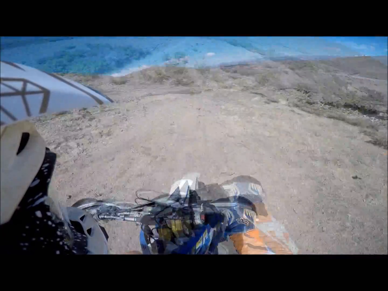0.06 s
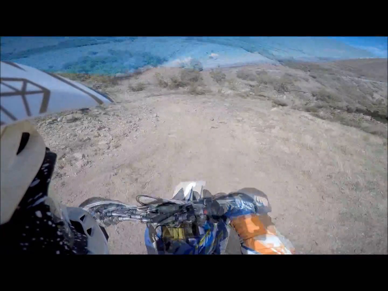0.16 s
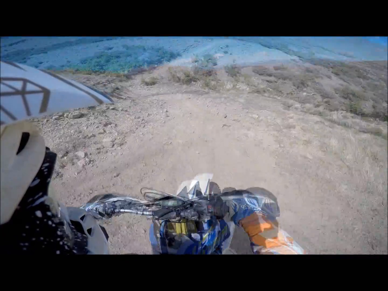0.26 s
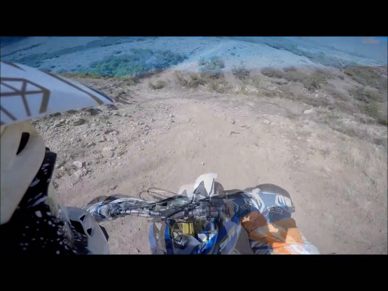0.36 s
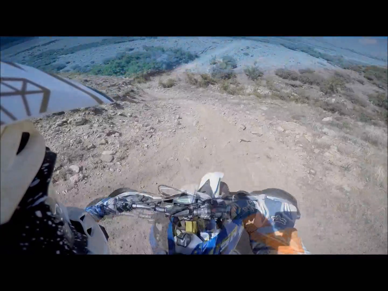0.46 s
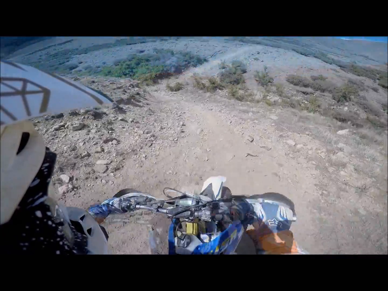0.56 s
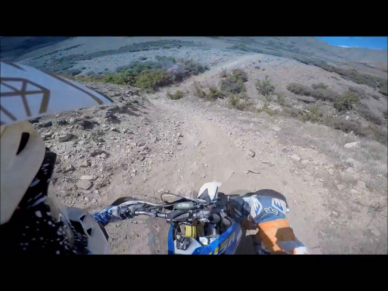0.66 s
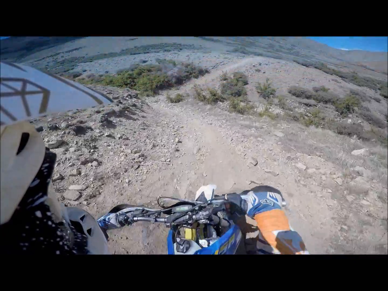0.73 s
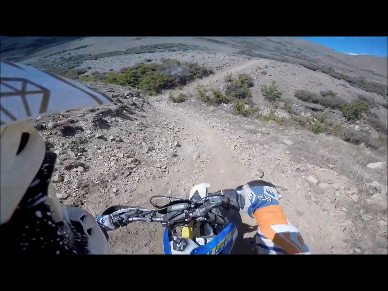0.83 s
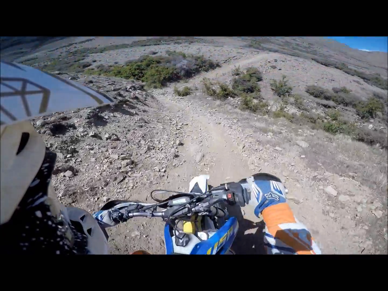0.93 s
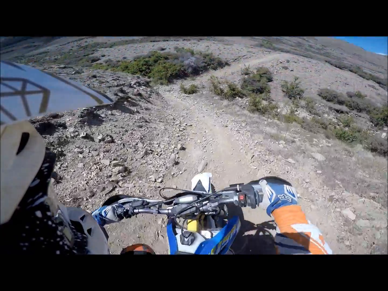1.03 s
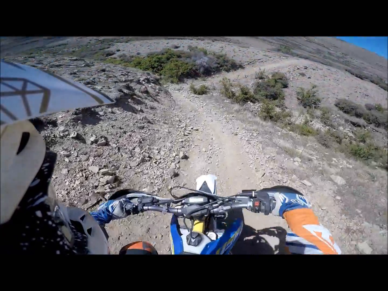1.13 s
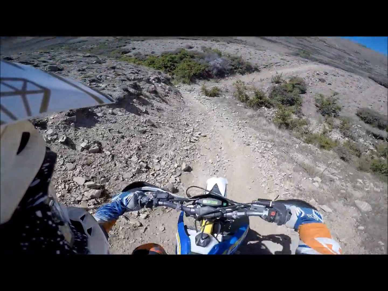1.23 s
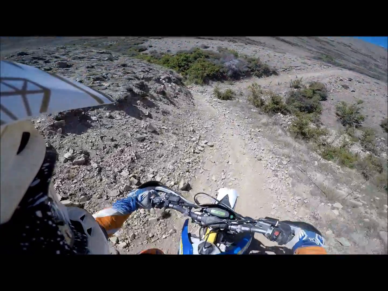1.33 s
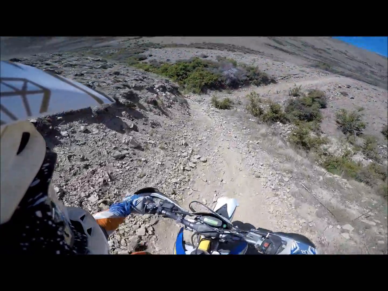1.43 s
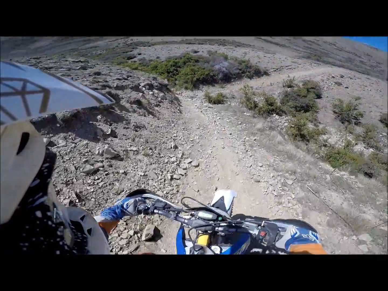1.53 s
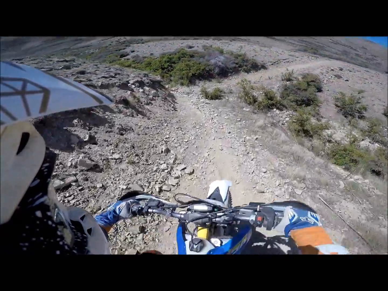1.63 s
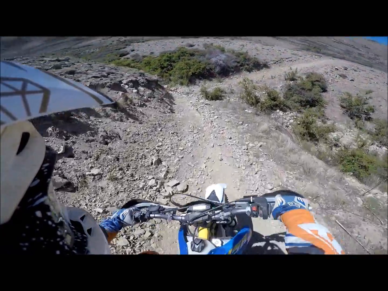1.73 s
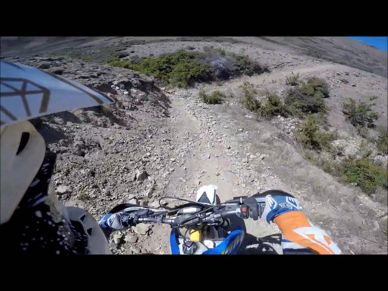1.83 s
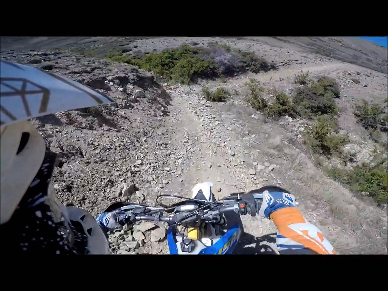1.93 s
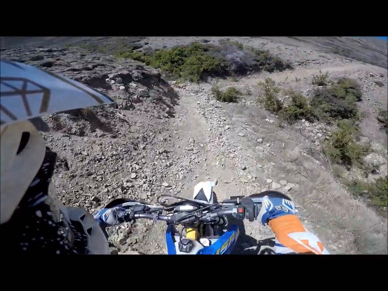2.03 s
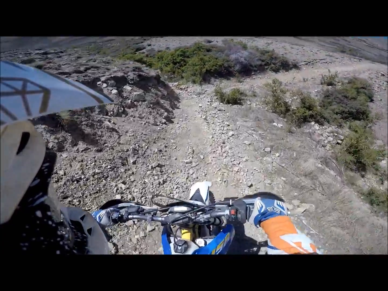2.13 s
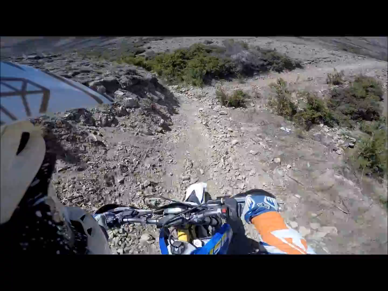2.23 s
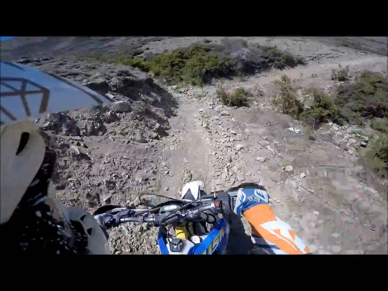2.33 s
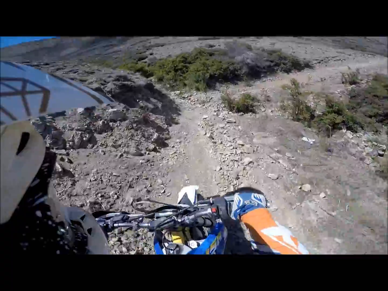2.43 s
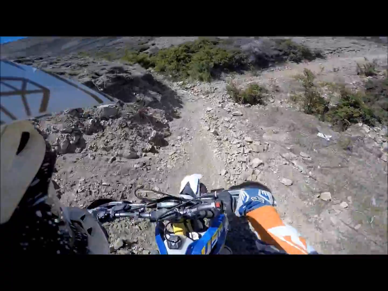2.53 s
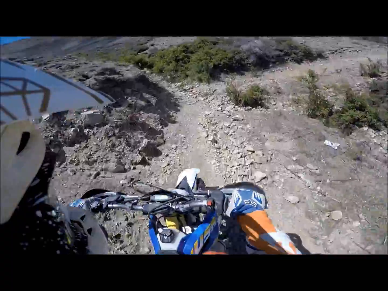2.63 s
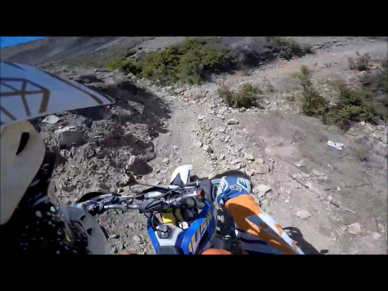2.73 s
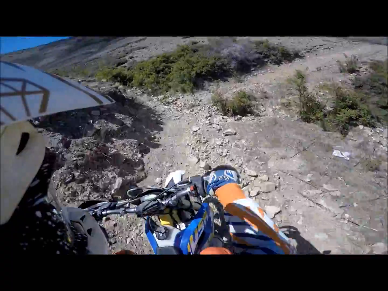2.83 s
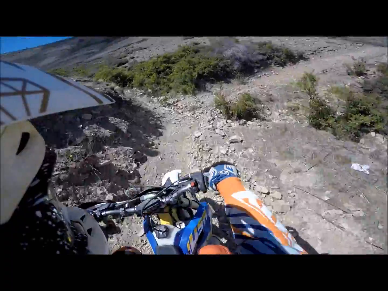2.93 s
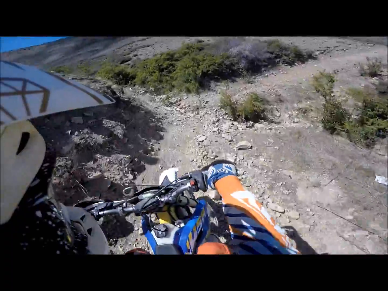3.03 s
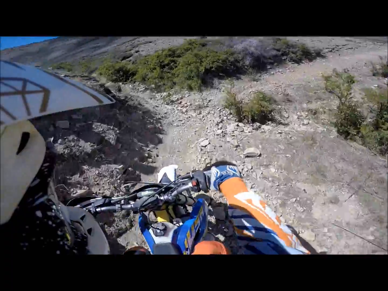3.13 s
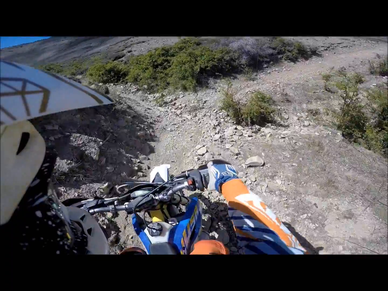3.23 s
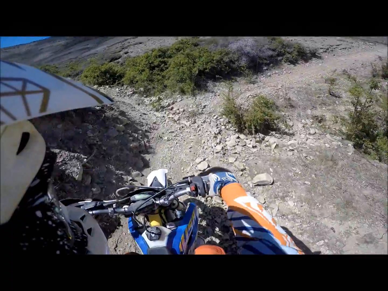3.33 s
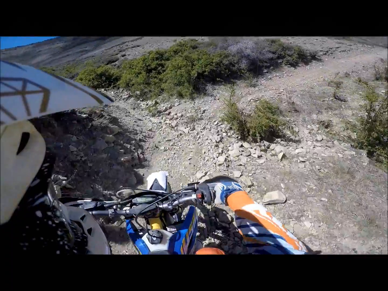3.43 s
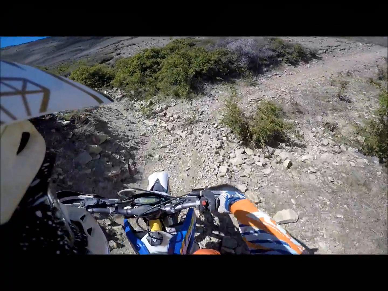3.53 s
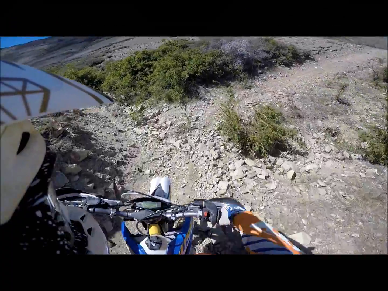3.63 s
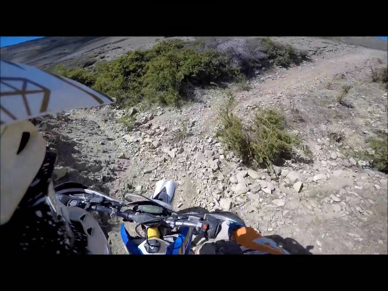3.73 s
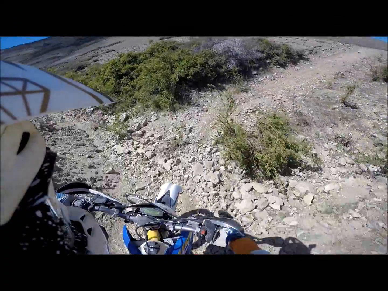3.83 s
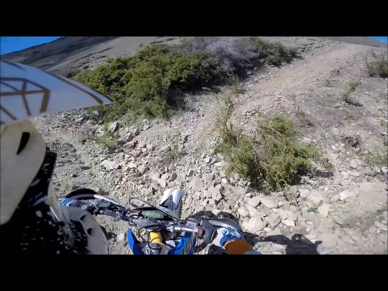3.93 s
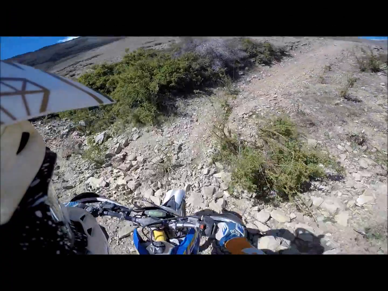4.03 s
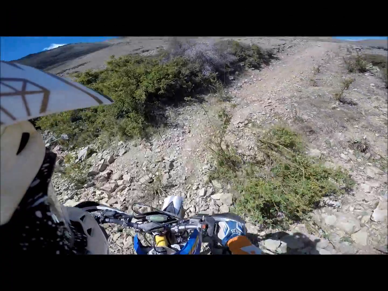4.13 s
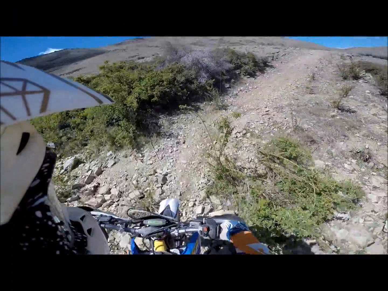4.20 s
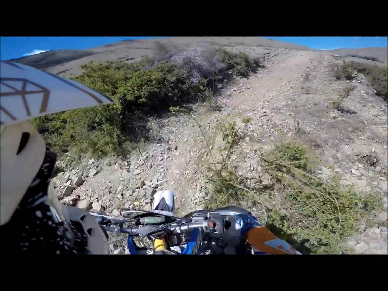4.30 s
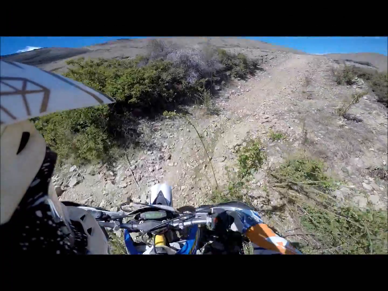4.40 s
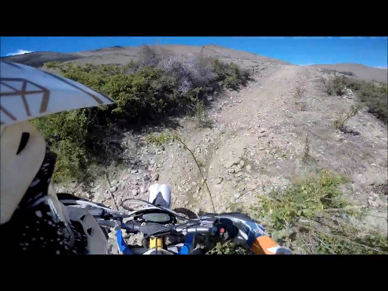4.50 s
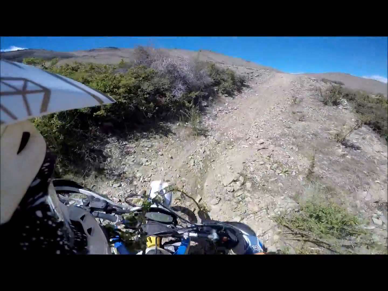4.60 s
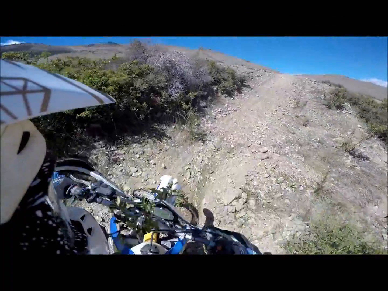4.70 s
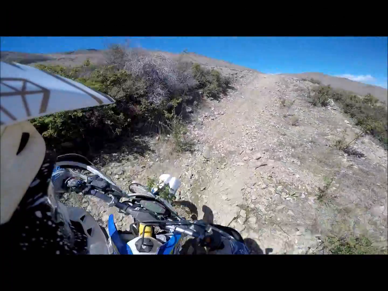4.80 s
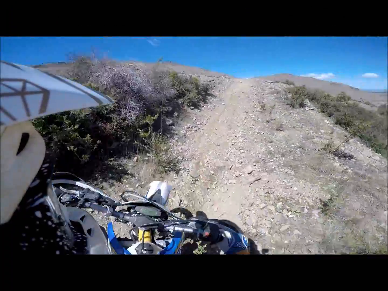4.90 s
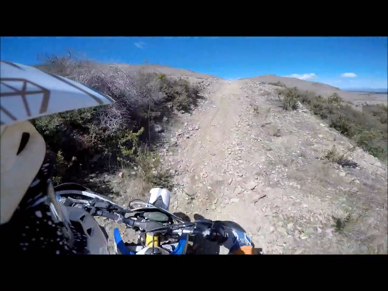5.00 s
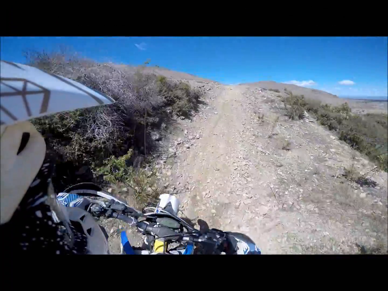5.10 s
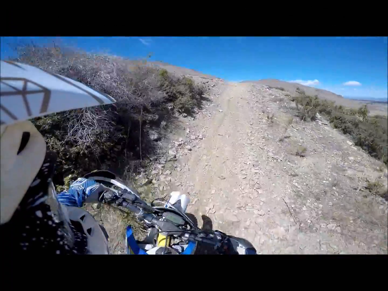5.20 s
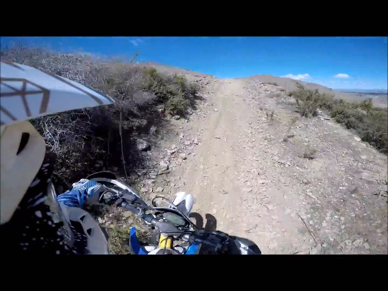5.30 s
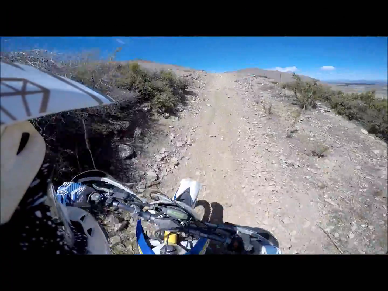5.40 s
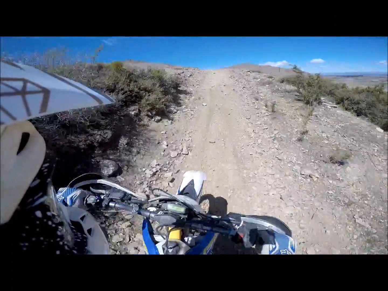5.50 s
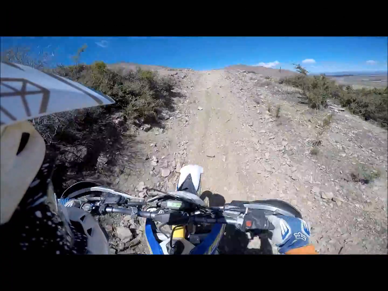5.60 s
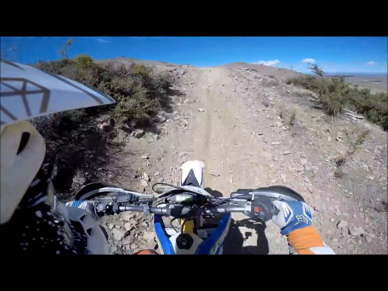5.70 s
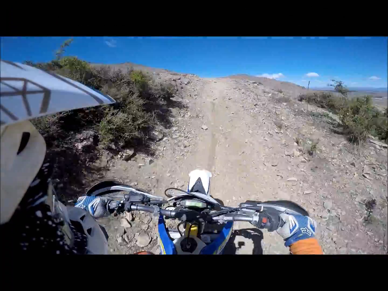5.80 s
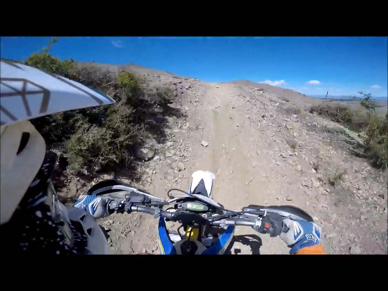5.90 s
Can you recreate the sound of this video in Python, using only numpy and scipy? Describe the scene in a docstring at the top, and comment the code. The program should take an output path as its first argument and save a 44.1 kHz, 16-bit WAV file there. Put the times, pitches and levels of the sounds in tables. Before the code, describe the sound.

Close, dry mono outdoor sound of an off-road motorcycle. A brief buzzing pull gives way to irregular barks and low gas muttering as the engine slows almost to stalling, with chain rattle, sharp pebble ticks and soft rumbling wind. It then revs in short bursts and settles on a strong, sustained nasal drone that grows harder as the throttle opens wide.

```python
"""First a droning two-stroke pull, then single stumbling pops, then longer pulls that end on a wide throttle.
An enduro bike on a stony hill trail, heard from the rider's helmet. Pulls are multiples of the crank speed
filtered by the exhaust pipe, with rasping gas; off the throttle, noise and weak pulses mutter and hard
firings excite decaying pipe resonances and a noisy chamber ping. Shaped noise gives the wind, clatter and
grit; clusters of short decaying modes give the stones that knock under the tyres."""
import sys
import numpy as np
from scipy import signal
from scipy.fft import rfft, irfft, next_fast_len
from scipy.io import wavfile
from scipy.ndimage import map_coordinates

SR = 44100
rng = np.random.default_rng(int(sys.argv[2]) if len(sys.argv) > 2 else 0)


def generate_wav(signal):
    """Clip the signal to [-1, 1] and save it as 16-bit WAV at the path in sys.argv[1]."""
    frames = np.transpose(np.atleast_2d(signal))
    scaled = np.clip(frames, -1, 1) * 32767
    pcm = np.round(scaled).astype(np.int16)
    wavfile.write(sys.argv[1], SR, pcm)


N = 262395


def amp(db):
    """Decibel law: level to amplitude gain."""
    return 10 ** (np.asarray(db) / 20)


def unit(x):
    """Normalisation: scale to rms 1."""
    return x / np.sqrt(np.mean(x ** 2) + 1e-20)


def along(points, x):
    """Logarithmic interpolation: read (x, dB) points on a log axis."""
    at, db = np.transpose(points)
    return np.interp(np.log(x + 1), np.log(at + 1), db)


def curve(rows):
    """Linear interpolation: (seconds, value) rows to one value per sample."""
    s, value = np.transpose(rows)
    return np.interp(np.arange(N) / SR, s, value)


def wobble(rate, step=16):
    """Slow random modulation: a smooth curve through rate random knots a second."""
    at = np.arange(0, N + step, step)
    knots = rng.standard_normal(int(N * rate / SR) + 4)
    return np.interp(np.arange(N), at, map_coordinates(knots, [at * rate / SR]))


def filtered(x, response):
    """Linear filtering: multiply the spectrum by a response of frequency."""
    size = next_fast_len(len(x) + SR // 2)
    spectrum = rfft(x, size) * response(np.fft.rfftfreq(size, 1 / SR))
    return irfft(spectrum, size)[:len(x)]


def noise(spectrum):
    """Spectral shaping: white noise coloured by (Hz, dB) points, at rms 1."""
    return unit(filtered(rng.standard_normal(N), lambda hz: amp(along(spectrum, hz))))


def ring(spectrum, size=8192):
    """Minimum phase: folding the cepstrum gives a causal impulse response of energy 1."""
    cepstrum = irfft(np.log(amp(along(spectrum, np.fft.rfftfreq(size, 1 / SR))) + 1e-6))
    cepstrum[1:size // 2] *= 2
    cepstrum[size // 2 + 1:] = 0
    response = irfft(np.exp(rfft(cepstrum)))
    return response / np.linalg.norm(response)


def add(track, s, sound):
    """Superposition: mix a sound into the track from time s."""
    part = track[max(round(s * SR), 0):][:len(sound)]
    part += sound[:len(part)]


# Wind spectrum. Each row: frequency in Hz, relative level in dB.
WIND = [(8.8, -30.5), (15, 3.5), (32, -1.5), (80, -0.5), (119, -7), (200, -12), (260, -39), (440, -120)]
# Strength of the wind on the helmet. Each row: time in seconds, level in dB before WIND_DB.
GUSTS = [(0.0, -26), (0.05, -20), (0.88, -14), (1.21, -26.5), (1.97, -18.5), (2.75, -25), (3.38, -20.5),
         (3.73, -25), (4.19, -17.5), (4.31, -30), (4.66, -23), (4.71, -38), (4.96, -23), (5.14, -34),
         (5.95, -32)]
WIND_DB = 1.1  # over the gust curve


def wind():
    """Turbulence: low noise with random swells buffets the helmet."""
    buffeting = unit(noise(WIND) * amp(1.4 * wobble(12)))
    return amp(curve(GUSTS) + WIND_DB) * buffeting


# Stones and twigs on rim and frame. Each row: start in seconds, level in dB before the decay,
# centre pitch in Hz, spread either way in log pitch.
KNOCKS = [(0.301, -24, 2482, 0.06), (0.324, -22.5, 3560, 0.55), (1.040, -27.5, 2330, 0.21),
          (1.087, -30, 2360, 0.16), (1.323, -26, 2992, 0.75), (1.465, -27, 3734, 0.34),
          (1.651, -25, 2784, 1.06), (2.115, -21, 720, 0.28), (2.145, -21.5, 2220, 1.1),
          (2.6, -28.5, 2730, 0.8), (4.644, -23.5, 5649, 0.12), (4.648, -18.5, 1913, 0.55),
          (4.696, -27, 2350, 0.53)]
KNOCK_T60_S, KNOCK_REF_HZ, KNOCK_SLOPE = 0.046, 2500, 0.7  # ring time at that pitch; lower knocks ring longer


def knocks(count=96):
    """Modal impact: each strike rings a cluster of short modes around its pitch."""
    out = np.zeros(N)
    t = np.arange(SR // 8) / SR
    for s, db, hz, spread in KNOCKS:
        offset, phase = rng.uniform(-1, 1, (2, count, 1))
        modes = np.sin(2 * np.pi * (hz * np.exp(spread * offset) * t + phase)).sum(0)
        t60 = KNOCK_T60_S * (KNOCK_REF_HZ / hz) ** KNOCK_SLOPE
        envelope = amp(-60 * t / t60) * (1 - np.exp(-t / 0.00037))
        add(out, s, amp(db) * unit(modes) * envelope)
    return out


# Crank speed under load, one list per stretch. Each row: time in seconds, turns per second.
REVS = [
    [(0.0, 65.7), (0.12, 71.6), (0.2, 65.4)],
    [(4.62, 50), (4.748, 59.6), (4.8, 59)],
    [(4.92, 45.4), (5.02, 55), (5.082, 60.1), (5.344, 62.3), (5.424, 67.2), (5.722, 62.1), (5.9, 66.6),
     (5.95, 64.9)],
]
# Crank speed on a closed or blipped throttle. Each row: time in seconds, turns per second.
COAST = [(0.5, 41.4), (0.7, 39.4), (0.94, 29.8), (1.1, 42.4), (1.4, 26), (2.3, 19.8), (3.98, 23),
         (4.21, 56), (4.4, 32)]


def crank_speed():
    """Rotational speed: loaded and coasting points join in one curve of turns per second."""
    loaded = [tuple(row) for rows in REVS for row in rows]
    return curve(sorted(loaded + [tuple(row) for row in COAST]))


# Throttle opening. Each row: time in seconds, opening from 0 (part) to 1 (wide).
THROTTLE = [(5.26, 0.088), (5.4, 0.95)]


def throttle():
    """Control curve: 0 on part throttle, 1 wide open."""
    return np.clip(curve(THROTTLE), 0, 1)


# Stretches of steady pull. Each row: start in seconds, end in seconds, then the levels of
# boom, bark and rasp in dB before WIDE_DB.
PULLS = [(-0.2, 0.239, -12, -17, -37), (4.074, 4.301, -16, -17.5, -37.5), (4.503, 4.82, -10.5, -16, -40),
         (4.876, 6.1, -12, -16, -43)]
PULL_ATTACK_S, PULL_RELEASE_S = 0.14, 0.064  # the engine picks up slowly and drops away faster
WIDE_DB = (-0.5, -2, 4)  # what a wide throttle adds to boom, bark and rasp


def pull_gain(layer):
    """Amplitude envelope of boom (0), bark (1) or rasp (2): each pull swells, holds and drops away."""
    t = np.arange(N) / SR
    gain = np.zeros(N)
    for start, end, *levels in PULLS:
        swell = np.clip((t - start) / PULL_ATTACK_S, 0, 1)
        drop = np.clip((end - t) / PULL_RELEASE_S, 0, 1)
        gain += amp(levels[layer]) * swell * drop
    return gain * amp(WIDE_DB[layer] * throttle())


def load():
    """Saturating drive: 0 with the throttle shut, 1 when the engine pulls."""
    return np.clip(pull_gain(0) / .1, 0, 1)


def firings(turns, speed, jitter_s, scatter_db):
    """Impulse train: one uneven pulse per crank turn, with mean power about 1."""
    at = np.flatnonzero(np.diff(np.floor(turns)))
    chance = rng.standard_normal((len(at), 2))
    when = np.clip(at + jitter_s * SR * chance[:, 0], 0, N - 1).astype(int)
    strength = amp(scatter_db * chance[:, 1]) * np.sqrt(SR / speed[at])
    return np.bincount(when, strength, N)


# Spectrum of clatter and grit. Each row: frequency in Hz, relative level in dB.
RATTLE = [(410, -40.5), (700, 1), (968, -7.5), (1160, -12.5), (1360, -10), (2130, -14), (2340, -11.5),
          (2730, -8), (3190, -17), (4130, -15), (5940, -19.5), (7400, -26.5), (8210, -34), (13100, -38.5),
          (15500, -54)]


def rattle(turns, level_db):
    """Modulated noise: piston and chain clatter swells with each turn; random grains of grit crackle."""
    each_turn = unit(1.13 + np.exp(-(turns % 1) / 0.1))
    clatter = each_turn * amp(1.75 * wobble(35)) * noise(RATTLE)
    # about 160 grains a second of uneven strength
    grains = (rng.random(N) < 160 / SR) * amp(3.7 * np.minimum(rng.exponential(size=N), 3))
    t = np.arange(SR // 50) / SR
    bursts = signal.fftconvolve(grains, np.exp(-t / 0.0014))[:N] * rng.standard_normal(N)
    grit = unit(signal.fftconvolve(bursts, ring(RATTLE))[:N])
    slack = 1 - .6 * load()  # a taut chain rattles less
    return amp(level_db) * slack * (clatter + amp(-8.0) * grit)


# The pipe's lower and upper groups of resonances. Each row: frequency in Hz before random detuning,
# bandwidth in Hz, relative level in dB.
BOOM = [(91.6, 170, -7.5), (238.5, 37, 8), (323, 34, -5.5)]
BARK = [(432.4, 46, 4.5), (494.3, 22.4, -11.5), (625.5, 90, -1.5)]


def resonate(modes, t, detune, rise_s):
    """Damped resonance: one blow on a group of pipe modes, rms 1 over its first 25 ms."""
    wave = np.zeros(len(t))
    for k, (hz, width, db) in enumerate(modes):
        tone = np.sin(2 * np.pi * hz * (1 + detune * rng.normal()) * t)
        wave += (-1) ** k * amp(db) * np.exp(-np.pi * width * t) * tone
    wave = wave * (1 - np.exp(-(t / rise_s) ** 2))
    return wave / np.std(wave[:SR // 40])


# Gas noise spectrum. Each row: frequency in Hz, relative level in dB.
MUTTER = [(65, -9.5), (110, -14), (152, 2), (188, -5), (224, 2.5), (372, -5), (439, -0.5), (518, -7),
          (593, -6), (953, -45.5), (1300, -49.5), (1690, -63.5), (2860, -120)]


def mutter(turns, speed, level_db):
    """Excitation and resonance: weak burns on a shut throttle thump in the pipe over a bed of gas noise."""
    pulses = firings(turns, speed, jitter_s=0.00099, scatter_db=4.0)
    t = np.arange(SR // 10) / SR
    thump = resonate(BARK, t, detune=0.012, rise_s=0.0071)
    thump += amp(-5.5) * resonate(BOOM, t, detune=0.0092, rise_s=0.003)
    puffs = signal.fftconvolve(pulses, thump / np.linalg.norm(thump))[:N]
    gas = unit(1 + 0.28 * np.cos(2 * np.pi * (turns - .25))) * noise(MUTTER)
    shut = 1 - .95 * load()
    return amp(level_db) * shut * (amp(-7.5) * puffs + gas)


# Ring of the chamber wall. Each row: frequency in Hz, relative level in dB.
WALL = [(900, -31), (1300, -4), (1750, -6), (2200, -8), (2800, -10.5), (5000, -19.5), (8000, -44.5)]
# Spectrum of the spitting gas. Each row: frequency in Hz, relative level in dB.
RASP = [(650, -49.5), (1100, -8), (1270, -12.5), (1660, -5.5), (2730, -11.5), (3290, -20), (5010, -10),
        (8430, -23), (13100, -27), (15500, -36)]


def rasp(turns, speed):
    """Convolution: under load each firing rings the chamber wall and spits gas."""
    pulses = firings(turns, speed, jitter_s=.00002, scatter_db=1)
    # the wall answers each firing with the same short burst of coloured noise
    wall = unit(signal.fftconvolve(pulses, noise(WALL)[:SR // 60])[:N])
    gas = unit(1.0 + np.exp(-(turns % 1) / 0.24)) * noise(RASP)
    return pull_gain(2) * (amp(-4.0) * gas + amp(-2.5) * wall)


# Hard firings. Each row: time in seconds, bark level in dB and chamber ping level in dB
# (both before the offsets in pops), number of firings in a row.
POPS = [(0.355, -11, -36.5, 1), (0.475, -17, -64, 1), (0.531, -9, -39, 1), (0.581, -8, -60, 1),
        (0.612, -15, -44, 1), (0.652, -10.5, -38.5, 3), (0.747, -12.5, -37.5, 1), (0.964, -8.5, -35.5, 3),
        (1.051, -11.5, -48, 2), (1.098, -11.5, -38, 1), (1.573, -13, -37.5, 1), (1.853, -16.5, -59, 1),
        (2.218, -12, -46, 1), (2.326, -17, -62, 1), (2.37, -11, -43.5, 1), (2.637, -9, -40.5, 1),
        (2.842, -11.5, -43, 1), (2.987, -11, -38.5, 1), (3.172, -8, -34, 1), (3.393, -9, -33.5, 1),
        (3.595, -13, -49, 1), (3.682, -13.5, -45.5, 1), (3.857, -9.5, -35, 1), (4.065, -10.5, -59, 1),
        (4.108, -6, -58, 1), (4.192, -6, -49.5, 2), (4.419, -27, -51, 1), (4.477, -18, -52, 2),
        (4.564, -19, -38.5, 1), (4.614, -10.5, -42.5, 1), (4.834, -16.5, -48.5, 1), (4.899, -17, -48, 2)]
# A firing booms most at middling revs. Each row: turns per second, boom over bark in dB before those offsets.
BOOM_BY_SPEED = [(23, -4.5), (32, 9), (44, 8.5), (53, 3)]
FADE_DB, PING_FADE_DB = 0.5, 11.5  # each further firing of a row is weaker, and pings much less


def hard_firings(turns, speed):
    """Crank timing: yields (s, boom dB, bark dB, ping dB), each firing of a row one turn after the last."""
    t = np.arange(N) / SR
    for start, first_bark_db, ping_db, count in POPS:
        start_turn = np.interp(start, t, turns)
        for k in range(round(count)):
            s = np.interp(start_turn + k, turns, t)
            bark_db = first_bark_db - k * FADE_DB
            boom_over_bark = np.interp(np.interp(s, t, speed), *np.transpose(BOOM_BY_SPEED))
            yield s, bark_db + boom_over_bark, bark_db, ping_db - k * PING_FADE_DB


# Spectrum of the chamber ping. Each row: frequency in Hz, relative level in dB.
PING = [(800, 1), (2000, 1.5), (3500, 1.5), (5200, 5), (6500, 2), (8000, -6.5), (12000, -6), (15500, -11.5)]


def pops(turns, speed):
    """Transient excitation: unburnt charge fires hard; the chamber wall pings first, then the pipe barks."""
    pipe, ping = np.zeros(N), np.zeros(N)
    t = np.arange(SR // 7) / SR
    ping_envelope = (1 - np.exp(-t / 0.002)) * amp(-60 * t / 0.099)
    for s, boom_db, bark_db, ping_db in hard_firings(turns, speed):
        add(pipe, s, amp(boom_db - 8.5) * resonate(BOOM, t, detune=0.031, rise_s=0.0033))
        add(pipe, s, amp(bark_db - 6.5) * resonate(BARK, t, detune=0.032, rise_s=0.0056))
        # the pressure wave runs back down the pipe and barks again
        add(pipe, s + 0.01106, amp(bark_db - 13.5) * resonate(BARK, t, detune=0.048, rise_s=0.0054))
        add(ping, s - .005, amp(ping_db + 9) * ping_envelope)
    return pipe + ping * noise(PING)


# Exhaust on part throttle. Each row: frequency in Hz, relative level in dB.
PIPE = [(60, -22.5), (125, -9), (175, -14.5), (205, -5.5), (250, 2.5), (305, -8.5), (365, -16.5), (428, 2),
        (485, -5.5), (555, -12), (680, -13.5), (760, -29.5), (850, -28), (1200, -53.5)]
# Exhaust on a wide throttle. Each row: multiple of the crank speed, relative level in dB.
WIDE = [(1, -22), (2, -10), (3, -2), (4, 1.5), (5, -6), (6, -10), (7, -9.5), (8, -8.5), (9, -16.5),
        (10, -16), (11, -18), (12, -36), (13, -24.5), (14, -33.5), (15, -41.5)]


def drone(turns, speed, count=16):
    """Harmonic series: even firings sound the pipe on every multiple of the crank speed."""
    order = np.arange(1, count + 1)[:, None]
    hz = order * speed
    # a wide throttle sharpens the blast, which fills in the notes between the resonances
    wide = throttle()
    gain = amp((1 - wide) * along(PIPE, hz) + wide * along(WIDE, order))
    # the pipe holds the higher notes back longer, and reflections off the ground and rider scatter each note's
    # delay: one firing runs into the next
    lag = (hz / 118) ** 2 + 1.2 * np.sin(hz / 47)  # radians
    # combustion is less even at low revs, and each note flutters on its own
    unsteady = (62 / speed) ** 4
    flutter = 1 + 0.17 * unsteady * np.array([wobble(30) for _ in order])
    phase = 2 * np.pi * order * (turns + 0.0037 * unsteady * wobble(50)) - lag
    notes = gain * flutter * np.sin(phase)
    low = 1 / (1 + (hz / 360) ** 12)  # share of each note in the boom; the rest is bark

    def group(share):
        """Power normalisation: a share of the notes, scaled by their nominal rms."""
        return (share * notes).sum(0) / np.sqrt(((share * gain) ** 2).sum(0) / 2)

    roughness = amp(-12.5) * (1 - .5 * wide) * unsteady * noise(PIPE)
    boom = pull_gain(0) * (group(low) + roughness)
    bark = pull_gain(1) * group(1 - low)
    return amp(0.36 * wobble(60)) * (boom + bark)


# Level of the clatter and muttering. Each row: time in seconds, level in dB before the settings below.
CLATTER_LEVEL = [(0.0, -42.5), (0.36, -40.5), (0.78, -36), (0.89, -35.5), (1.09, -43.5), (1.33, -46),
                 (1.95, -39.5), (4.12, -42), (4.26, -48.5), (4.51, -46), (4.66, -39), (4.91, -49),
                 (5.72, -37.5), (5.95, -45)]
RATTLE_DB, MUTTER_DB = 3, 16.5  # clatter and weak firings, over that level
IDLE_TURNS_PER_S, MUTTER_DB_PER_OCTAVE = 22.2, 2.5  # weak firings grow with the revs


def scene():
    """Superposition: the crank drives exhaust and clatter; trail and wind lie around them."""
    speed = crank_speed()
    turns = np.cumsum(speed) / SR
    level_db = curve(CLATTER_LEVEL)
    mutter_db = level_db + MUTTER_DB + MUTTER_DB_PER_OCTAVE * np.log2(speed / IDLE_TURNS_PER_S)
    surroundings = wind() + knocks()
    clatter = rattle(turns, level_db + RATTLE_DB)
    exhaust = mutter(turns, speed, mutter_db) + rasp(turns, speed) + pops(turns, speed) + drone(turns, speed)
    return (surroundings + clatter + exhaust)[None]


TOP_HZ = 15450  # nothing is kept from here up


def record(dry):
    """Soft saturation and band limiting: the tallest peaks are rounded off and the top is cut."""
    rounded = dry[0] / (1 + np.abs(dry[0]) ** 8) ** (1 / 8)
    return filtered(rounded, lambda hz: hz < TOP_HZ)[None]


dry = scene()
out = record(dry)
generate_wav(out)
```